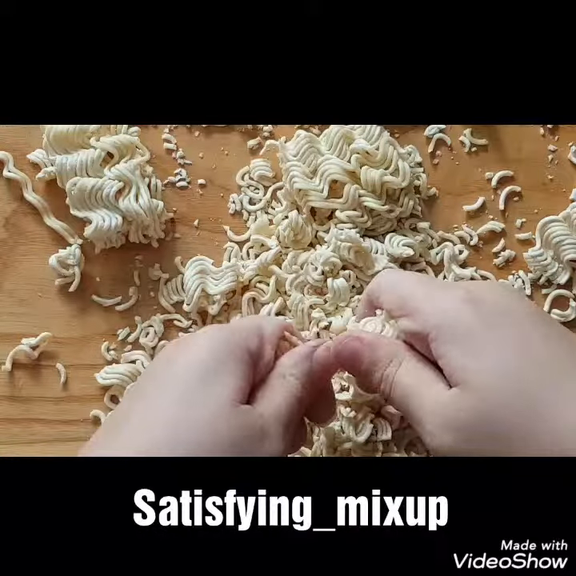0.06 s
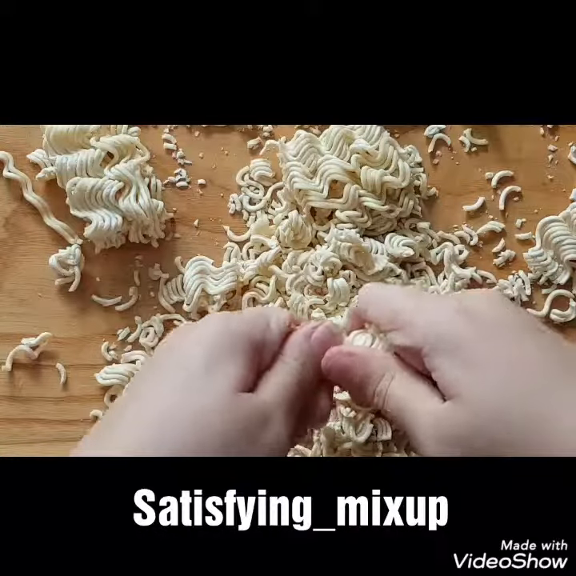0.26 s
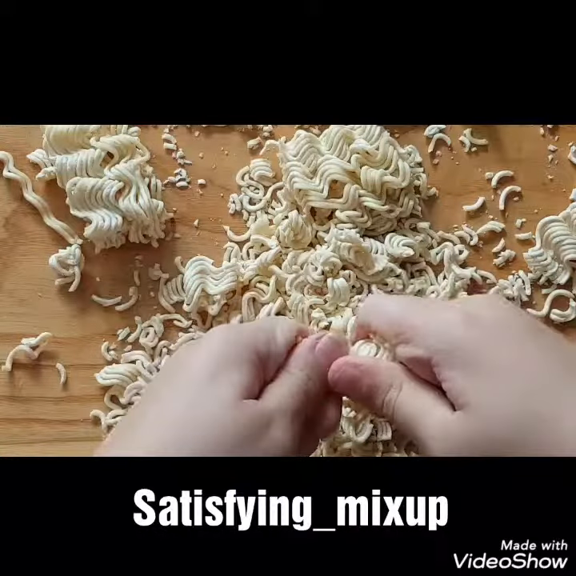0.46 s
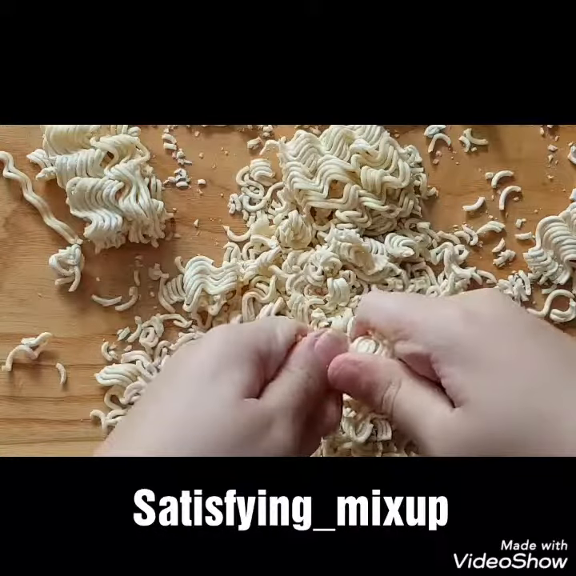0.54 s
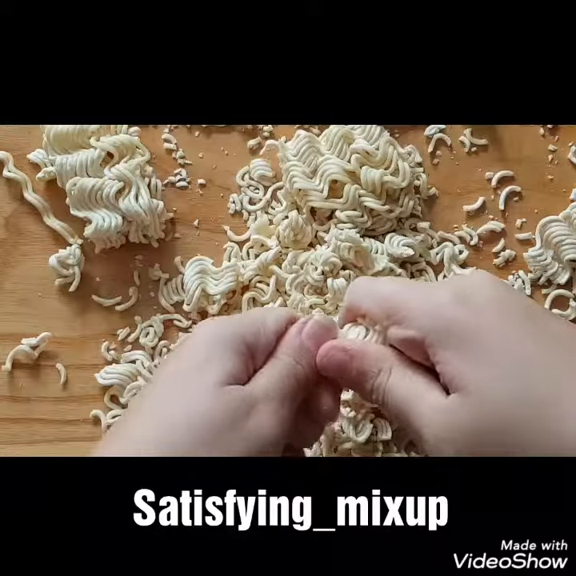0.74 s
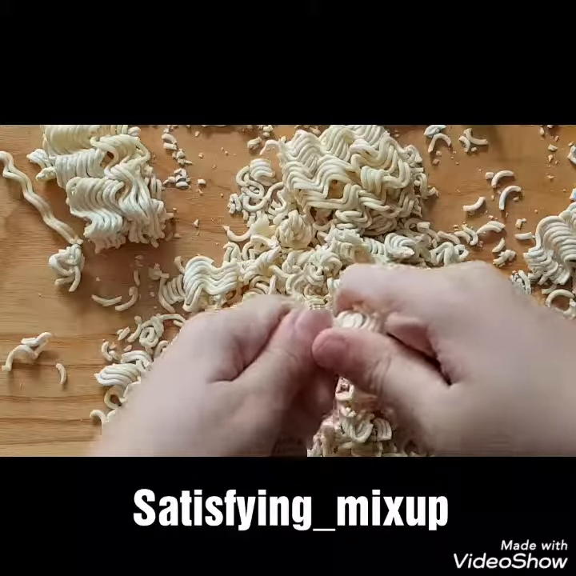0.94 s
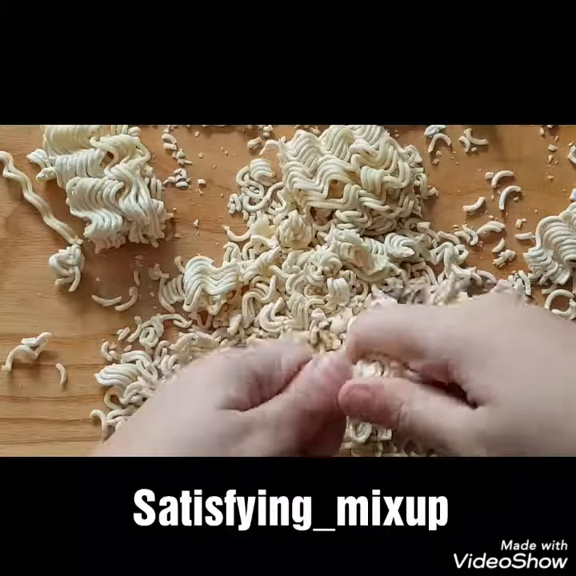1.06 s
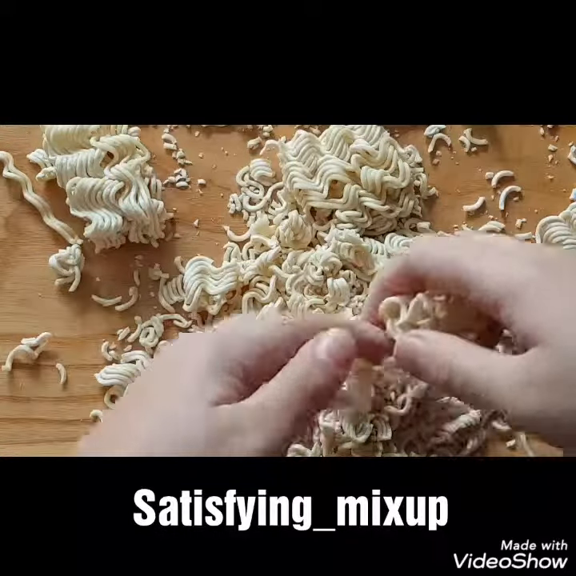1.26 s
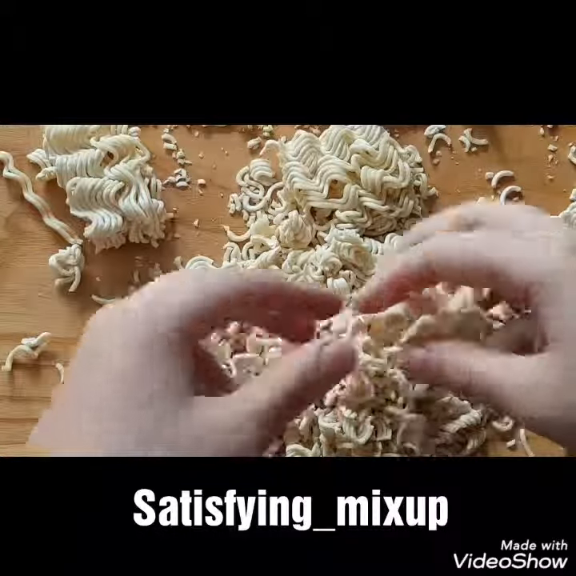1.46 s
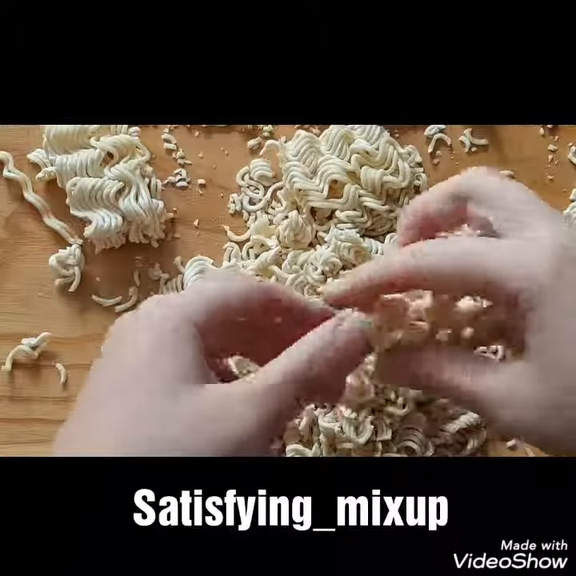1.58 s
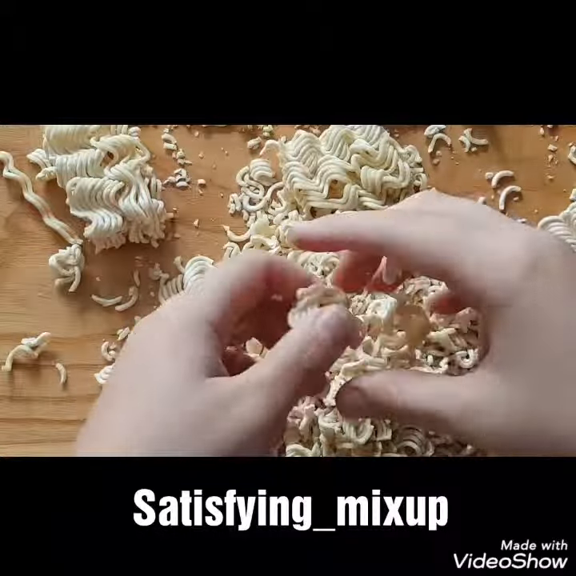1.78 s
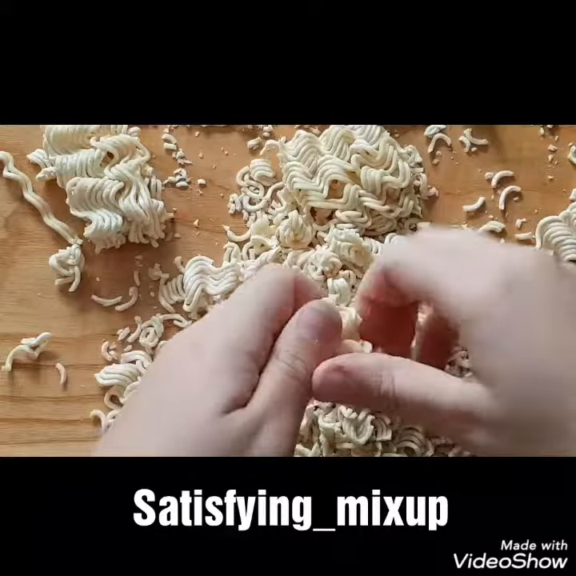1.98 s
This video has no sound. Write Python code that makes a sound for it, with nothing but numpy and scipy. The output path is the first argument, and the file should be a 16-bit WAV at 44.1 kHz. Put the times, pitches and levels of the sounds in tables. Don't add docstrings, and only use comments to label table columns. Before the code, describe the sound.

Dry noodles snapped by hand very close to the microphone: a loud sharp crack early, several smaller snaps and crumbly crackle, then faint breaks and loose bits ticking on a wooden table in a quiet room.

```python
import sys
import numpy as np
from scipy import signal
from scipy.fft import rfft, irfft
from scipy.io import wavfile
from scipy.ndimage import uniform_filter1d

SR = 44100
rng = np.random.default_rng(int(sys.argv[2]) if len(sys.argv) > 2 else 0)


def store_pcm(level_fs):
    pcm = np.round(np.clip(level_fs, -1, 1) * 32767).astype(np.int16)
    wavfile.write(sys.argv[1], SR, np.atleast_2d(pcm).T)


def field_ratio(decibels):
    return 10 ** (np.asarray(decibels, dtype=float) / 20)


N = 88200


def band_pass(x, lo_hz, hi_hz):
    sos = signal.butter(2, [lo_hz, min(hi_hz, 0.45 * SR)], "band", fs=SR, output="sos")
    return signal.sosfilt(sos, x)


def add(out, start_s, sound):
    i = int(start_s * SR)
    out[i:i + len(sound)] += sound[:max(N - i, 0)]


def ring(hz, t60_s, rise_s, size=600, phase=0.0):
    t = np.arange(size) / SR
    decay = np.exp(-np.log(1000) * t / t60_s)
    return np.sin(2 * np.pi * hz * t + phase) * decay * (1 - np.exp(-t / rise_s))


# [f/Hz, density/dB per Hz]
ROOM_SPECTRUM = [(55, -6), (100, -7), (317, -14.5), (416, -15.5), (818, -23.5), (1070, -23.5),
                 (1440, -29.5), (11300, -38.5), (16000, -43)]


def room_noise():
    level_db = -69
    hz = np.fft.rfftfreq(N, 1 / SR)
    shape_hz, shape_db = np.array(ROOM_SPECTRUM).T
    gain = field_ratio(np.interp(np.log(hz + 1), np.log(shape_hz), shape_db))
    noise = irfft(rfft(rng.standard_normal((2, N))) * gain, N)
    noise = signal.sosfilt(signal.butter(6, 14500, fs=SR, output="sos"), noise)
    return noise * field_ratio(level_db) / noise.std()


# [t/s, table ring level/dB, tick level/dB re ring, tick f/Hz]
BIT_LANDINGS = [(1.359, -59.5, 2.5, 1480), (1.3931, -51, 0, 3430), (1.459, -41, -0.5, 3900),
                (1.465, -49.5, 2, 3920), (1.481, -46.5, -0.5, 2860), (1.502, -44, -24.5, 3500),
                (1.5283, -45, -1, 2500), (1.545, -54.5, -6, 2300), (1.581, -58, 0, 2980),
                (1.609, -52.5, -8, 2620), (1.636, -50, -8.5, 2080), (1.666, -57.5, 7, 2620),
                (1.679, -49.5, -8, 2420), (1.726, -57.5, 0, 3170), (1.85, -59, 3, 2330),
                (1.886, -46.5, 4.5, 3740), (1.925, -39.5, -2.5, 2620), (1.9327, -50.5, 11, 2330),
                (1.946, -47, -22, 2010), (1.964, -67, 11.5, 3620), (1.97, -47, 1, 3230),
                (1.985, -45.5, -10, 1980), (1.998, -60, 9, 3500)]
# [f/Hz, level/dB, t60/s]
TABLE_MODES = [(316.8, -1, .12), (259, -9, 0.058), (382, -4, 0.042), (508, -9, 0.046), (760, -9.5, 0.033),
               (967, -14, 0.043), (1202, -16.5, .04)]


def table():
    wood, ticks = np.zeros(N), np.zeros(N)
    for start_s, db, tick_db, tick_hz in BIT_LANDINGS:
        for hz, mode_db, t60_s in TABLE_MODES:
            level_wobble, pitch_wobble = rng.standard_normal(2)
            mode_level = db + mode_db + 2 * level_wobble * (mode_db < -3)
            mode = ring(hz * (1 + pitch_wobble / 200), t60_s, 0.003, size=9000)
            add(wood, start_s, field_ratio(mode_level) * mode)
        tick = crack(db + tick_db - 0.5, tick_hz, treble_db=-13, air_db=-9)
        add(ticks, start_s + 0.00051, tick)
    return wood, ticks


# [t/s, level/dB]
SQUEEZE = [(0, -81.5), (.09, -70.5), (0.192, -79), (.23, -45.5), (0.331, -69), (.44, -66), (.56, -73),
           (.65, -90), (.9, -72), (0.999, -83.5), (1.15, -66), (1.242, -70), (1.433, -80), (1.47, -63),
           (1.601, -68.5), (1.7, -69.5), (1.8, -84), (1.941, -70)]
# [f/Hz, width/Hz, level/dB]
BLOCK_BANDS = [(698, 650, -2.5), (1403, 630, -6.5), (2347, 1400, -1.5), (3000, 1100, 2.5),
               (3900, 1100, -3.5), (7530, 7600, -6), (11500, 9400, -8)]


def crumbs():
    crumbs_per_s, clumps_per_s, clump_db = 2400, 110, 2.5
    scatter_db, cap_db, level_db = 3, 9, 8
    loose_s, loose_db = 1.2, 6

    gaps, scatter = -np.log(1 - rng.random((9000, 2))).T
    times = np.cumsum(gaps) / crumbs_per_s
    heard = times < N / SR
    index = (times[heard] * SR).astype(int)

    def clump():
        return clump_db * np.interp(times * clumps_per_s, np.arange(999), rng.standard_normal(999))

    db = np.interp(times, *np.array(SQUEEZE).T) + clump() + level_db
    db = db + np.minimum(scatter_db * scatter, cap_db)
    out = np.zeros(N)
    for hz, width, band_db in BLOCK_BANDS:
        far_from_ring = abs(np.log(hz / 3000)) > 0.5
        loose = loose_db * (times > loose_s) * far_from_ring
        strength = field_ratio(db + band_db + clump() + loose) * rng.standard_normal(len(times))
        clicks = np.zeros(N)
        np.add.at(clicks, index, strength[heard])
        out += band_pass(clicks, hz - width / 2, hz + width / 2) * np.sqrt(SR / width)
    return out / np.sqrt(20)


JOLT_TIMES = [.2097, .2098, .241, .405, .422, .684, .699, .729, .095, .767, .2113, .2105]
# [peak level/dB, f/Hz, t60/s]
JOLT_RINGS = [(-34, 193, 0.044), (-23.5, 304, 0.013), (-41.5, 670, 0.035), (-48.5, 444, 0.025),
              (-50.5, 430, 0.021), (-53, 330, 0.018), (-58, 960, 0.025), (-31.5, 43, 0.02),
              (-46.5, 38, 0.092), (-40.5, 620, 0.0046), (-25.5, 1000, .009), (-41.5, 144, 0.026)]


def jolts():
    out = np.zeros(N)
    for start_s, (db, hz, t60_s) in zip(JOLT_TIMES, JOLT_RINGS):
        add(out, start_s, field_ratio(db) * ring(hz, t60_s, 0.00045, size=5000))
    return out


def crack(db, hz, treble_db, air_db=0.0):
    rise_s, ring_t60_s, body_t60_s, body_hz = 0.00017, 0.0084, 0.003, 737
    upper_phase, _, overtone_shift = rng.random(3) * 2 * np.pi
    spit_noise, after_noise = rng.standard_normal((2, 600))
    rough = np.clip(-(db + 30) / 20, 0, 1)

    def fade(t60_s):
        return ring(0, t60_s, rise_s, phase=np.pi / 2)

    click = (2.6 - rough) * ring(hz, 0.003 * (1 + (db > -16)), 0.0003, phase=np.pi)
    upper = field_ratio(-13) * ring(4400, ring_t60_s, rise_s, phase=upper_phase)
    after = 3 * band_pass(after_noise, 0.54 * hz, 1.35 * hz)
    after = field_ratio(-16 + 6.1 * rough) * after * fade((1.01 + rough) * ring_t60_s)
    knock = ring(body_hz, body_t60_s, rise_s)
    knock = knock + ring(body_hz * (2.4 + overtone_shift / 20), body_t60_s, rise_s)

    air_gain = field_ratio(1 - 9 * rough + air_db + 3 * (db > -18))
    spit = band_pass(spit_noise, 6500, 9500) + air_gain * band_pass(spit_noise, 9500, 14500)
    spit = spit * fade(0.007)
    tone = click + upper + after + field_ratio(-9.5) * knock
    return field_ratio(db + 2.5) * (tone + field_ratio(treble_db + 9.5) * spit)


# [t/s, peak level/dB, ring f/Hz, treble level/dB re ring]
SNAPS = [(0.0524, -48.5, 3000, -21), (0.063, -34, 3230, -12), (0.0954, -47.5, 3260, -13.5),
         (0.2088, -11, 2670, -31), (0.2397, -21.5, 3000, -12.5), (0.2505, -29.5, 2680, -19),
         (0.315, -53.5, 3260, -13), (0.3565, -41, 3050, -11), (0.374, -41.5, 3150, -29),
         (0.4036, -34, 3570, -6.5), (0.4207, -23, 3180, -53), (0.436, -40.5, 2960, -27),
         (0.4919, -48.5, 3300, -32), (0.5197, -52.5, 3070, -12), (0.5838, -36, 3900, -18),
         (0.6408, -50, 3000, -11), (0.6584, -67, 2870, -7), (0.683, -23, 2690, -22),
         (0.6968, -34, 3900, -5), (0.725, -28, 2700, -12), (0.7659, -27, 3240, -27),
         (0.2175, -37, 2700, -30), (.2235, -56, 2680, -14), (0.5382, -54, 3220, -31),
         (0.5437, -44, 3000, -42), (0.553, -52, 3130, -17), (0.569, -55, 3080, -26),
         (0.6918, -46, 2500, -19), (0.7497, -63, 2720, -45),
         (0.8131, -53, 2740, -16), (0.8255, -57, 3000, -10), (0.8508, -58.5, 2060, -3),
               (0.8779, -46, 2710, -13.5), (0.8954, -35, 3130, -25), (0.902, -45.5, 3440, -17),
               (0.9105, -45.5, 2980, -24.5), (0.9155, -44, 2930, -19), (1.022, -48, 2950, -43.5),
               (1.0512, -40, 2910, -50), (1.0934, -59, 4140, -7.5), (1.0956, -53, 3130, -34),
               (1.119, -55, 3025, -28.5), (1.1344, -49.5, 3540, -15), (1.1974, -63.5, 3680, -4.5),
               (1.2278, -48.5, 2790, -6), (1.2357, -44, 3240, -8.5), (1.2535, -50.5, 2330, -11.5),
               (1.2886, -66.5, 3440, -11.5), (1.3296, -52.5, 2200, -10), (1.3665, -46.5, 2280, -11.5),
               (1.5883, -45.5, 3060, -11), (1.399, -56, 2700, -6), (1.4868, -49.5, 3000, -3),
               (1.494, -55, 3000, -6), (1.512, -67, 4500, 4.5), (1.582, -55, 2500, -2),
               (1.605, -59, 2880, -18), (1.9, -59, 5500, -3.5), (1.9345, -36, 2230, -21),
               (1.938, -46, 2270, -29), (1.6474, -59, 2330, -28),
         (.2097, -16.5, 2420, -13.5), (0.2111, -19, 3130, -24.5), (0.2165, -51, 2600, -29.5),
                   (0.2285, -59, 2900, -22.5), (0.2344, -41, 3430, -22), (0.4046, -25, 4330, -35),
                   (0.4079, -31, 3000, -7), (0.407, -55, 3060, -12), (0.6975, -24.5, 3120, -24),
                   (0.726, -21.5, 3335, -22.5), (1.241, -51.5, 2500, -1)]


def snaps():
    delay_s = 0.0007
    out = np.zeros(N)
    for start_s, db, hz, treble_db in SNAPS:
        add(out, start_s + delay_s, crack(db, hz, treble_db))
    return out


def reflections(dry):
    t = np.arange(20000) / SR

    def tail(db, t60_s, hi_hz):
        return field_ratio(db - 60 * t / t60_s) * band_pass(rng.standard_normal(len(t)), 430, hi_hz)

    nearby, room = tail(-20.5, 0.0087, 16000), tail(-51.5, 0.2, 17000)
    return signal.fftconvolve(dry, nearby + room)[:N]


def scene():
    wood, ticks = table()
    dry = snaps() + jolts() + ticks
    wet = reflections(dry)
    room_mid, room_side = room_noise()
    near = dry + wet + wood + crumbs()
    smeared = signal.fftconvolve(near, rng.standard_normal(60) / 8)[:N]
    low = np.roll(band_pass(near, 40, 900), 40)
    side = field_ratio(-22.5) * room_side + field_ratio(-41.5) * smeared + field_ratio(-38.5) * low
    return near + room_mid + side * np.array([[1], [-1]])


TREBLE_GAPS = [.125, .148, .17, .196, .385, .41, .545, .568, .615, .69, .708, .753, .82, .845, .868, .888,
               1.03, 1.053, 1.077, 1.101, 1.124, 1.193, 1.216, 1.355, 1.378, 1.448, 1.75, 1.773, 1.912,
               1.958]


def treble_dropouts(x):
    gap_s, split_hz, dip_db = 0.0074, 2500, -20
    t = np.arange(N) / SR
    lost = sum(1.0 * (abs(t - s) < gap_s / 2) for s in TREBLE_GAPS)
    lost = uniform_filter1d(lost, size=90)
    top = signal.sosfiltfilt(signal.butter(3, split_hz, "high", fs=SR, output="sos"), x)
    return x - top * lost * (1 - field_ratio(dip_db))


def top_cut(x):
    return signal.sosfilt(signal.butter(12, 16970, fs=SR, output="sos"), x)


def record(dry):
    x = np.tanh(2 * dry) / 2
    x = signal.sosfilt(signal.butter(2, 70, "high", fs=SR, output="sos"), x)
    x = treble_dropouts(x)
    x = signal.sosfilt(signal.ellip(8, 0.2, 60, 16100, fs=SR, output="sos"), x)
    return top_cut(x)


dry = scene()
out = record(dry)
store_pcm(out)
```